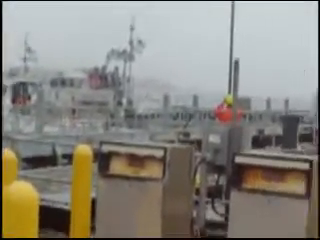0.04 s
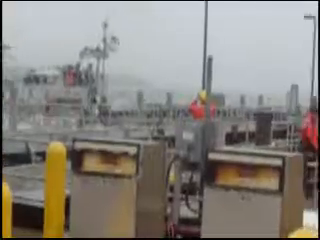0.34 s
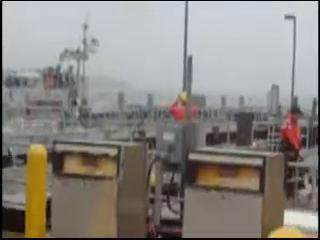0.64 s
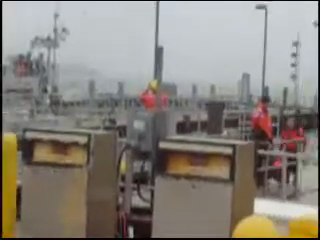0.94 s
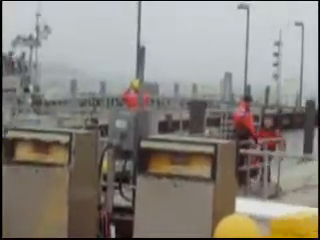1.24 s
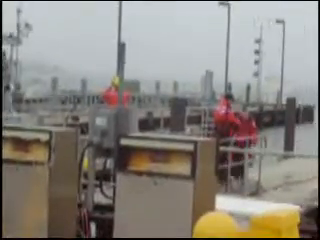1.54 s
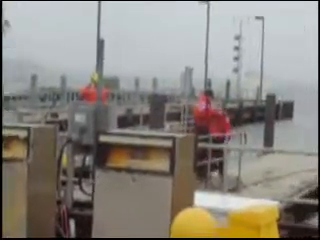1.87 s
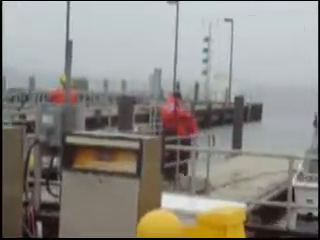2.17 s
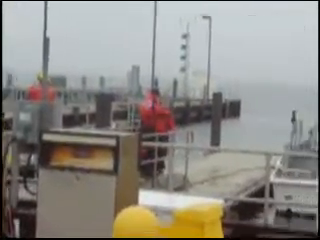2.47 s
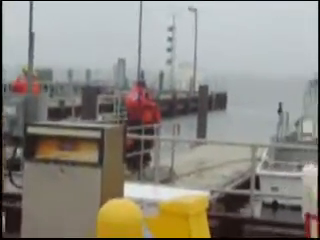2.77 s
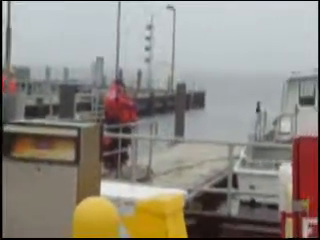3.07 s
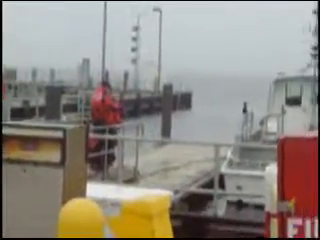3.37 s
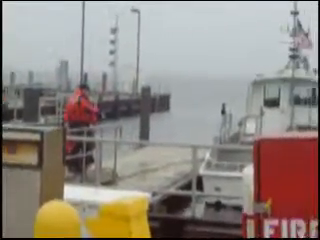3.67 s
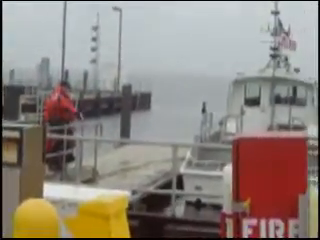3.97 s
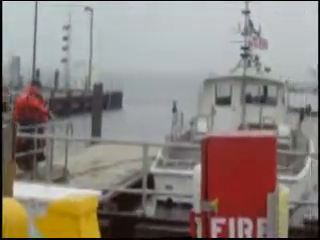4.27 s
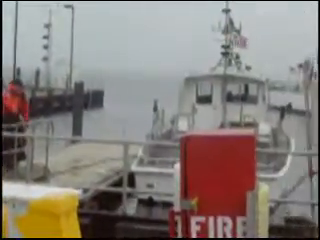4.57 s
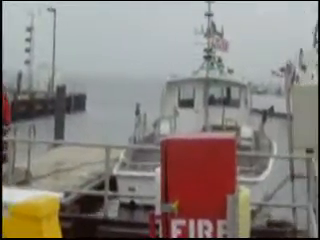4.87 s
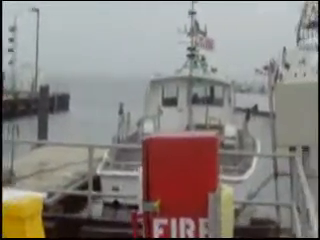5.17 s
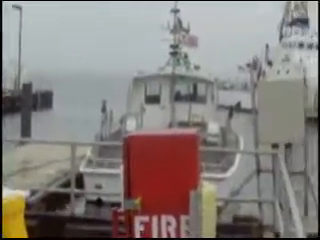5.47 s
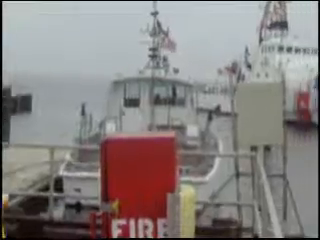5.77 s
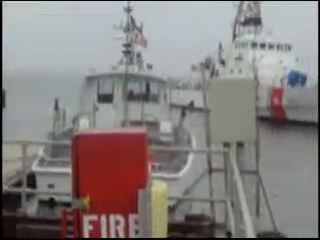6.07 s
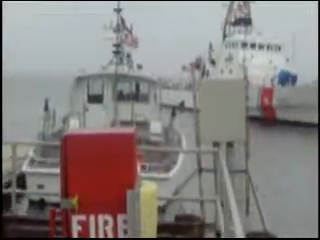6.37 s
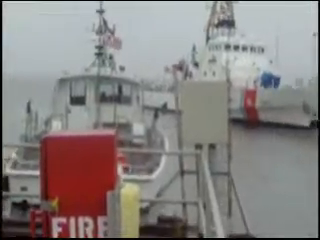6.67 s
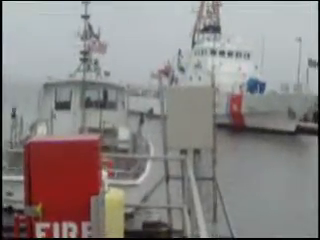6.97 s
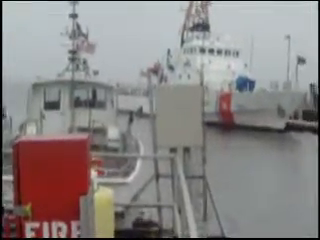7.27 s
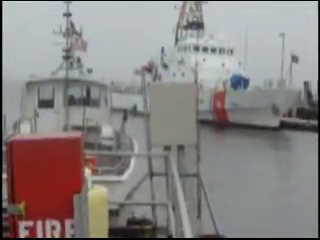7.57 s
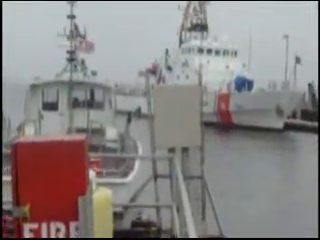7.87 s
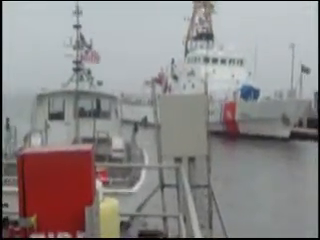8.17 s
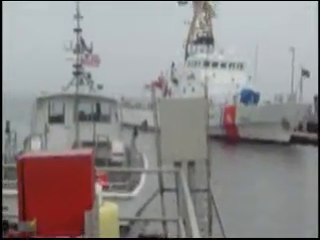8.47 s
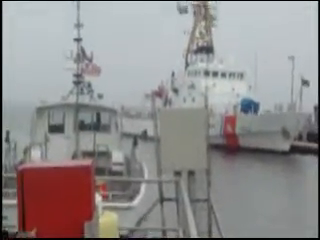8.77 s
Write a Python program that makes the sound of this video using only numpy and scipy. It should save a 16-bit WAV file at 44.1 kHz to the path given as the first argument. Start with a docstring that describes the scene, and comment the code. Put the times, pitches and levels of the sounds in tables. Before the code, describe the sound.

A big diesel engine idles outdoors on a dock for the whole nine seconds or so. It makes a steady, clattering drone at constant speed, with a low hum and two faint higher whines; its tone shifts slightly as the microphone turns. Puffs of wind hit the microphone at about 0.7 and 1.2 seconds. At about 1.5 seconds one brief squeal slides slightly downward. From 2.5 seconds the breeze freshens: gusts rush and rumble at roughly 2.5, 3.4, 6.3, 7 and, weakly, 8 seconds, among short hollow puffs that come thickest in the last three seconds. The engine sinks a little under each gust. The whole sound dips for an instant near 1.1 seconds and several times after 5.5 seconds. The small camera microphone makes everything dull, narrow and slightly overloaded.

```python
"""A big six-cylinder diesel idles on a quay: every firing knocks the block, fan air rings the housing,
and driven machinery adds a hum and two whines. The drone overloads the narrow-band input of a pocket
camera, which pans slowly away from the exhaust in a freshening breeze. At 0.65 s the first puff hits
the microphone port; near 1.1 s the level dips briefly, as it will again; at 1.55 s a squeal sounds.
From 2.5 s on, five gusts pass among further puffs, and the engine sinks a little under each."""
import sys
import numpy as np
from scipy import signal
from scipy.fft import rfft, irfft, next_fast_len
from scipy.io import wavfile
from scipy.ndimage import map_coordinates

SR = 44100
rng = np.random.default_rng(int(sys.argv[2]) if len(sys.argv) > 2 else 0)


def put_to_file(sound):
    """Save the sound as 16-bit audio at rate SR, in the file named by the first command-line argument."""
    columns = np.atleast_2d(sound).T  # one column per channel
    safe = np.clip(columns, -1, 1)
    whole_steps = np.round(safe * 32767)
    wavfile.write(sys.argv[1], SR, whole_steps.astype(np.int16))


N = 392931
FFT_SIZE = next_fast_len(N + SR // 10, real=True)
TIME, FREQS = np.arange(N) / SR, np.fft.rfftfreq(FFT_SIZE, 1 / SR)
CYCLE_HZ = 7.2148  # four-stroke cycles per second; each cylinder fires once a cycle


def amp(db):
    """Amplitude ratio of a level in decibels."""
    return 10 ** (np.asarray(db) / 20)

def unit(x):
    """Normalisation to rms 1."""
    return x / np.sqrt(np.mean(x ** 2) + 1e-20)

def over_hz(points):
    """Interpolation of (frequency [Hz], value) points on a logarithmic frequency axis."""
    hz, value = np.transpose(points)
    return np.interp(np.log(FREQS + 1), np.log(hz + 1), value)

def colour(x, gain):
    """Linear filtering: the spectrum of x is multiplied by a gain at each frequency."""
    return irfft(rfft(x, FFT_SIZE) * gain, FFT_SIZE)[:N]

def below(hz, order):
    """Magnitude response of a maximally flat low-pass."""
    return 1 / np.sqrt(1 + (FREQS / hz) ** (2 * order))

def noise(gain):
    """Spectrally shaped noise of rms 1."""
    return unit(colour(rng.standard_normal(N), gain))

def wander(rate_hz, size=4096):
    """Random fluctuation of rms 1, low-passed at rate_hz."""
    hz = np.fft.rfftfreq(size, N / SR / size)
    spectrum = rfft(rng.standard_normal(size)) * (hz > 0) / np.hypot(1, (hz / rate_hz) ** 3)
    return np.interp(TIME, np.linspace(0, N / SR, size), unit(irfft(spectrum, size)))

def swell(peak_s, half_s):
    """Bell-shaped envelope of height 1, down to 1/e at half_s from its peak."""
    return np.exp(-((TIME - peak_s) / half_s) ** 2)

def panned(db, db_per_s):
    """Directivity: a source's level drifts as the camera turns towards or away from it."""
    return db + db_per_s * TIME


def firings(cycles, cylinders=6):
    """Periodic excitation: one soft swell per cylinder, made lopsided by lower harmonics of the cycle."""
    phase = 2 * np.pi * cycles
    return np.cos(cylinders * phase) + 0.3 * np.sin(phase) + 0.3 * np.cos(3 * phase)

# Spectrum of block, valves and fan: (frequency [Hz], relative spectral level [dB])
CLATTER_SPECTRUM = [(20, -22), (60, -14), (140, -7.5), (300, -1), (410, -3.3), (580, -0.5), (900, -3),
                    (1170, -9), (1550, -12.5), (1850, -18.5), (2550, -14), (3100, -26), (4100, -27),
                    (5000, -36.5)]
# Part of the clatter that repeats every cycle: (frequency [Hz], share of power [0-1])
PERIODIC_SHARE = [(100, 0.02), (550, 0.04), (880, 0.1), (1100, 0.32), (1500, 0.43), (2200, 0.04),
                  (4000, .15)]
# Resonances of block and housing: (frequency [Hz], width [Hz], lift [dB])
RESONANCES = [(513, 120, 2.1), (656, 47, 0.5), (876, 160, 3.5), (1067, 59, 5), (1305, 110, 5),
              (1563, 100, 4), (2290, 48, -0.5)]

def clatter(cycles):
    """Forced vibration: firings shake the resonant engine, partly periodically and partly at random."""
    period = round(SR / CYCLE_HZ)
    pattern = rng.standard_normal(period)
    repeated = map_coordinates(pattern, [cycles % 1 * period], order=3, mode="grid-wrap")
    share = over_hz(PERIODIC_SHARE)
    shake = colour(repeated, np.sqrt(share)) + colour(rng.standard_normal(N), np.sqrt(1 - share))
    knocks = shake * (1 + 0.11 * firings(cycles))
    ring_db = sum(lift / (1 + (2 * (FREQS - hz) / width) ** 2) for hz, width, lift in RESONANCES)
    sound = unit(colour(knocks, amp(over_hz(CLATTER_SPECTRUM) + ring_db)))
    # exhaust, block and valve gear lie in different directions, so each has its own level
    exhaust = colour(sound, below(1100, order=5) ** 2)
    valves = colour(sound, 1 - below(1500, order=6) ** 2)
    block = sound - exhaust - valves
    churn_db = 0.58 * wander(26)  # moving air makes the whole sound churn
    exhaust_db = panned(-13, -0.14) + 0.7 * wander(40)
    block_db = panned(-13, 0.16)
    valves_db = panned(-13.5, -0.09) + 0.9 * swell(4.5, 1.3) + 0.7 * wander(9.9)  # loudest midway
    return (exhaust * amp(exhaust_db) + block * amp(block_db) + valves * amp(valves_db)) * amp(churn_db)


# Prominent tones of the block, many swelling or sinking once during the pan:
# (multiple of the cycle rate, relative level [dB], swell time [s], swell [dB])
BLOCK_HARMONICS = [(12, -45, 0, 0), (18, -45, 0, 0), (36, -40, 7.5, 4), (84, -37, 7.9, -6),
                   (91, -37, 1.3, -4), (93, -40, 1.5, 3), (104, -42, 0, 0), (110, -40, 0, 0),
                   (111, -38, 0, 0), (114, -33.3, 1, 4.5), (118, -32.5, 3.3, -8), (121, -35, 4.7, -14),
                   (124, -39, 0, 0), (126, -39, 0, 0), (128, -39, .3, 3), (131, -40, 0, 0),
                   (135, -33.5, 4.9, 3.5), (138, -38.5, 4.7, 4), (142, -39, 0, 0), (144, -35.5, 5.4, 5),
                   (146, -36.5, 5, 2.5), (148, -40, 0, 0), (152, -34.5, 8.4, 8), (158, -40, 6, 3),
                   (174, -42, 8.2, 7), (180, -41, 1, 4), (216, -48, 0, 0), (222, -44, 0, 0),
                   (306, -52, 0, 0)]

def block_tones(cycles, gain_db=0.3):
    """Resonance: the block favours some cycle harmonics; each fades by interference as echoes shift."""
    steps = np.arange(0, N / SR + 0.3, 0.25)
    tones = np.zeros(N)
    for multiple, db, swell_s, swell_db in BLOCK_HARMONICS:
        echoes = rng.standard_normal(len(steps)) + 1j * rng.standard_normal(len(steps))
        direct = np.exp(2j * np.pi * rng.random())
        path = np.interp(TIME, steps, direct + 0.13 * echoes)
        level = amp(db + gain_db + swell_db * swell(swell_s, half_s=0.8))
        tones += level * (path * np.exp(2j * np.pi * multiple * cycles)).real
    return np.sqrt(2) * tones


# Hum, its octave, lower whine and upper whine during the pan:
# (initial level [dB], drift [dB/s], swell time [s], swell half-width [s], swell [dB])
MACHINE_LEVELS = [(-22, -0.07, 5.6, 2.1, -2.2), (-33, 0.06, 5.2, 1.6, 4.5), (-27, -0.54, 7.4, .4, -8),
                  (-32.5, -0.07, 6.3, 0.77, 4.5)]

def hum_and_whines(hum_hz=191.68, whine_hz=(512.2, 570.2)):
    """Scattering: the tones of the driven machinery flutter more and more in the freshening air."""
    clock = TIME + 0.00009 * wander(4.8)
    scattered_share = 0.054 + 0.018 * TIME
    pitches = (hum_hz, 2 * hum_hz, *whine_hz)
    tones = np.zeros(N)
    for hz, (db, db_per_s, swell_s, half_s, swell_db) in zip(pitches, MACHINE_LEVELS):
        path = 1 + scattered_share * (wander(24) + 1j * wander(16))
        level = amp(panned(db, db_per_s) + swell_db * swell(swell_s, half_s))
        tones += level * (path * np.exp(2j * np.pi * (hz * clock + rng.random()))).real
    return np.sqrt(2) * tones


# Bands of the housing, each heard from some angles only:
# (frequency [Hz], width [Hz], peak time [s], half-width [s], peak level [dB])
HOUSING_BANDS = [(860, 220, 0.54, 0.83, -31), (529, 50, 2.8, 1.1, -26), (865, 130, 6.9, 0.54, -26),
                 (1064, 110, 6.7, 2.8, -27)]

def housing(pitch_waver=0.025):
    """Directional radiation: fan air rings the housing in bands that come and go as the camera turns."""
    sound = np.zeros(N)
    for hz, width, peak_s, half_s, db in HOUSING_BANDS:
        band = noise(1 / (1 + (2 * (FREQS - hz) / width) ** 4))
        position = np.cumsum(1 + pitch_waver * wander(6))
        wavering = map_coordinates(band, [position], order=1, mode="mirror")
        sound += wavering * amp(db) * swell(peak_s, half_s)
    return sound


# Rush of the breeze: (frequency [Hz], relative spectral level [dB])
RUSH_SPECTRUM = [(30, -23), (60, -9), (95, 0.5), (160, 2), (300, 0), (420, -4), (560, -8.5), (900, -18.5),
                 (2500, -47)]

def breeze(gust_rush_db, gust_buffet_db):
    """Turbulence: eddies rush past the microphone port; the largest buffet it in the deep bass."""
    eddies = noise(amp(over_hz(RUSH_SPECTRUM)))
    buffets = noise(below(73, order=3) * (1 - below(15, order=2)))
    # both grow steadily as the breeze freshens; the rush is uneven by 1 dB rms
    rush_db = -25 + 0.54 * TIME + gust_rush_db + wander(20)
    buffet_db = -48.5 + 1.63 * TIME + gust_buffet_db
    return eddies * amp(rush_db) + buffets * amp(buffet_db)


# Puffs of wind on the port: (peak time [s], half-width [s], peak level [dB])
WIND_PUFFS = [(.65, 0.057, -19), (1.17, 0.043, -16.5), (2.735, 0.1, -16.5), (3.097, 0.049, -27),
              (3.325, 0.057, -15), (3.595, 0.087, -17.5), (5.206, .1, -20.5), (5.99, 0.041, -18),
              (6.53, 0.13, -19.5), (6.686, 0.087, -18), (6.92, 0.18, -20.5), (7.156, 0.033, -16),
              (7.445, 0.027, -17), (7.65, 0.037, -27), (7.863, 0.032, -12), (8.522, .03, -12),
              (8.694, 0.021, -13), (8.873, .025, -20)]

def puffs(low_hz=165, high_hz=417):
    """Flow impingement: single eddies strike the port squarely, each with a short hollow roar."""
    roar = noise(below(high_hz, order=4) * (1 - below(low_hz, order=4)))
    return roar * sum(amp(db) * swell(peak_s, half_s) for peak_s, half_s, db in WIND_PUFFS)


# Brief dips in level: (time [s], depth [dB], half-width [s])
LEVEL_DIPS = [(1.09, 2.5, .03), (5.6, 3.5, 0.047), (5.743, 2.5, 0.03), (6.32, 2, 0.037),
              (7.286, 1.5, 0.041), (7.925, 4.5, 0.022), (8.572, 4, 0.047), (8.756, 3, 0.06)]

def dips():
    """Amplitude modulation: the gain of the whole sound sags for a moment and comes back."""
    return amp(-sum(depth * swell(at_s, half_s) for at_s, depth, half_s in LEVEL_DIPS))


def squeal(peak_s=1.55, half_s=0.076, hz=800, fall_hz_per_s=260, db=-17.5):
    """Frequency modulation: one brief tone glides unsteadily downward through the drone."""
    pitch_hz = hz - fall_hz_per_s * np.clip(TIME - peak_s, -2 * half_s, 2 * half_s) + 5 * wander(30)
    phase = 2 * np.pi * np.cumsum(pitch_hz) / SR
    return np.sqrt(2) * amp(db) * swell(peak_s, half_s) * np.sin(phase)


# Gusts: (start [s], hold [s], added rush [dB], added buffeting [dB])
WIND_GUSTS = [(2.52, 0.27, 5.5, 3), (3.35, 0.15, 3.5, 10), (6.297, 0.16, 4.5, 8), (7.05, 0.64, 2.6, 4.5),
              (8.1, 0.27, 0.7, 1.5)]

def gusts(rise_s=0.23, fall_s=0.34):
    """Wind noise grows with flow speed: returns the dB that gusts add to the rush and the buffeting."""
    added_db = np.zeros((2, N))
    for start_s, hold_s, *strength_db in WIND_GUSTS:
        corners = start_s + np.cumsum([0, rise_s, hold_s, fall_s])
        added_db += np.outer(strength_db, np.interp(TIME, corners, [0, 1, 1, 0]))
    return added_db


def scene():
    """Superposition: engine, wind and squeal add at the microphone; the engine sinks under each gust."""
    cycles = CYCLE_HZ * (TIME + 0.00006 * wander(2.3))  # the governor holds the speed almost still
    gust_rush_db, gust_buffet_db = gusts()
    engine = clatter(cycles) + block_tones(cycles) + hum_and_whines() + housing()
    engine *= amp(-0.29 * gust_rush_db)
    wind = breeze(gust_rush_db, gust_buffet_db) + puffs()
    return ((engine + wind + squeal()) * dips())[None]


def record(dry, ceiling=0.49, decimation=4, edge_hz=7200):
    """Clipping and imaging: a quarter-rate converter keeps the band under 5 kHz and leaks its mirror."""
    clipped = np.clip(amp(-0.5) * dry[0], -ceiling, ceiling)
    end_fades = signal.windows.tukey(N, 0.001)
    narrow = colour(clipped * end_fades, below(4862, order=50))
    pulses = decimation * narrow * (np.arange(N) % decimation == 0)  # sampling mirrors the spectrum
    leak = amp(-12.5) * below(6430, order=14)
    smooth = colour(pulses, np.maximum(below(5330, order=14), leak))
    final_lowpass = signal.firwin(511, edge_hz, window=("kaiser", 9), fs=SR)
    return signal.oaconvolve(smooth, final_lowpass, "same")[None]


dry = scene()
out = record(dry)
put_to_file(out)
```